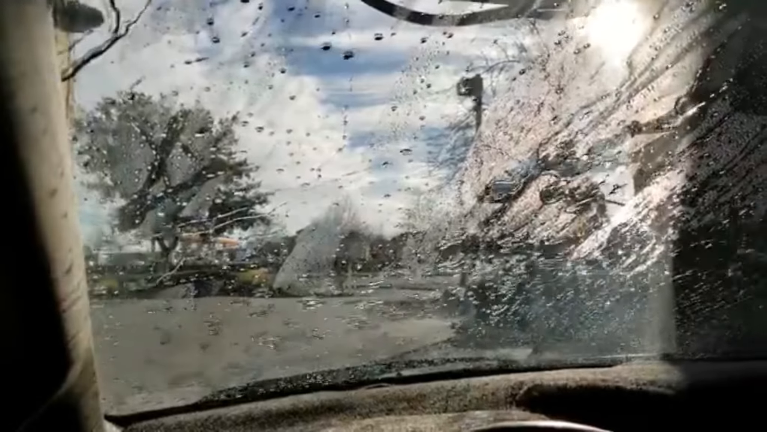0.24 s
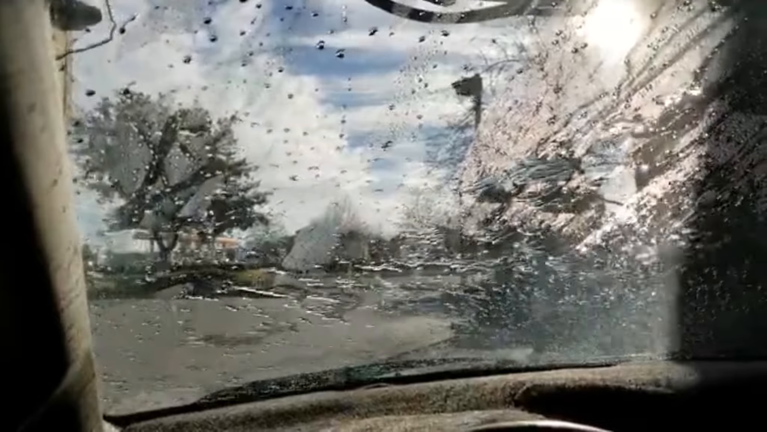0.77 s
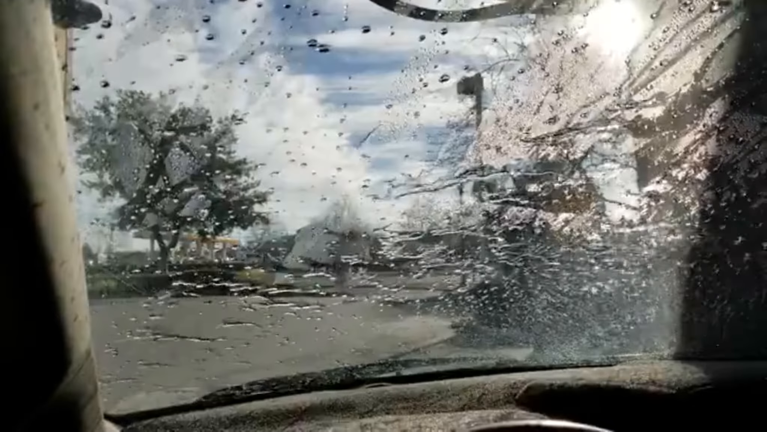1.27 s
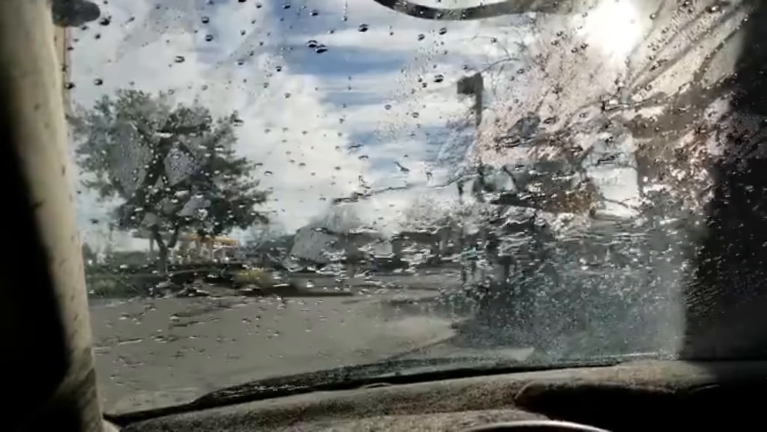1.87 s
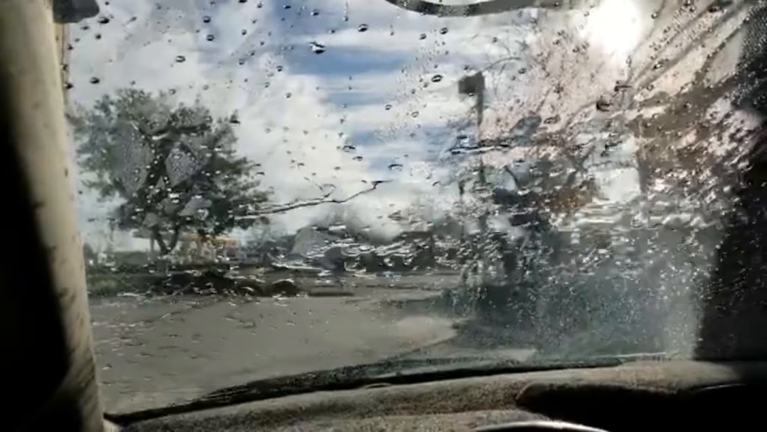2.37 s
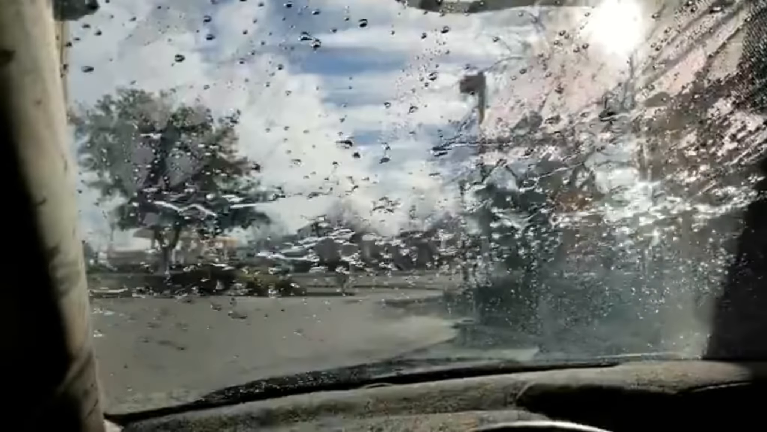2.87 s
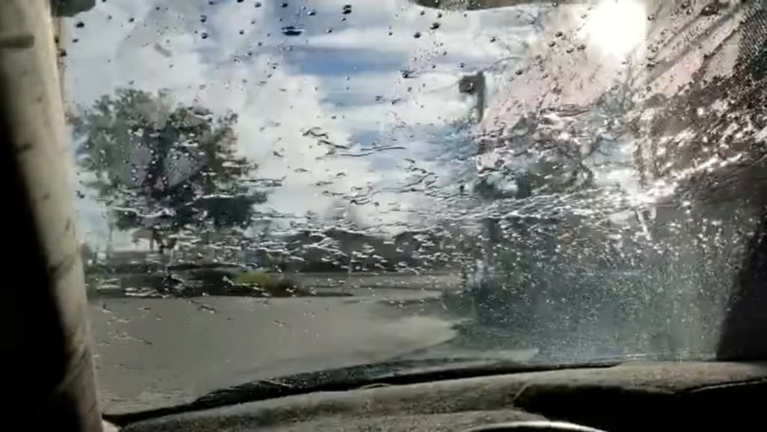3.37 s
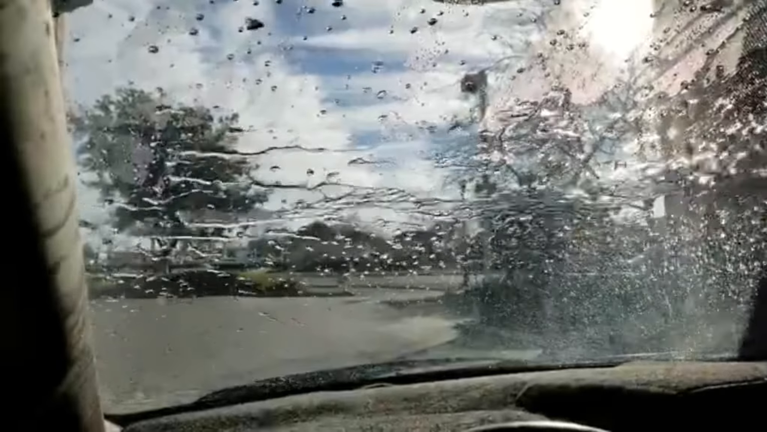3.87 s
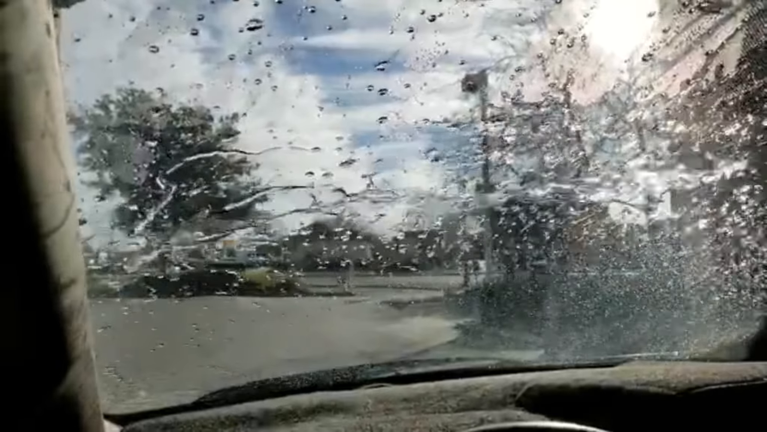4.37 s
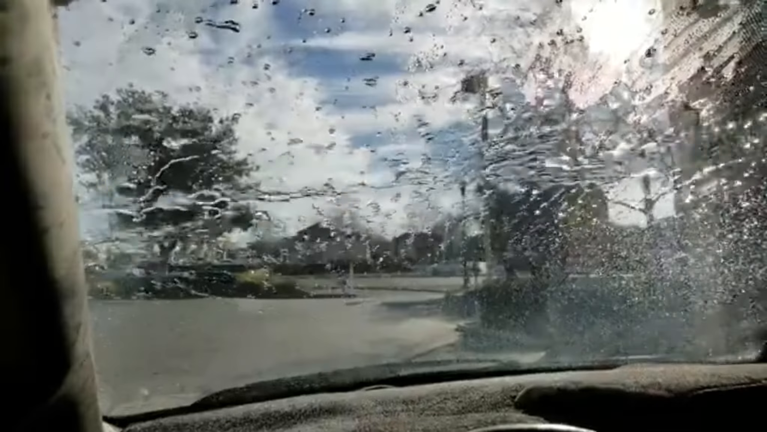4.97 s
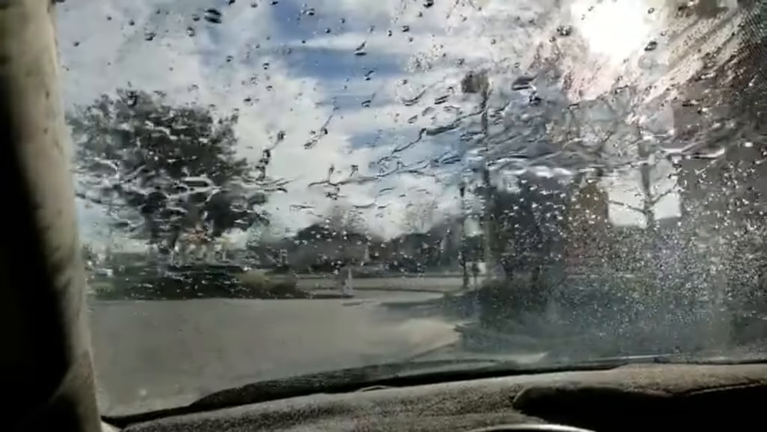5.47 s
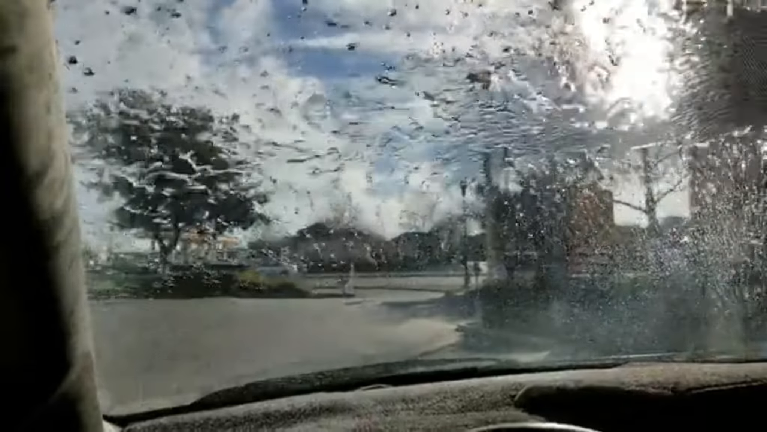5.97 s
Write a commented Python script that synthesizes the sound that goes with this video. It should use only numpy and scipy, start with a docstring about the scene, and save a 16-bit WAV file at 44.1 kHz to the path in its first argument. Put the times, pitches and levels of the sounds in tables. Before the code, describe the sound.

Powerful blowers roar over a car's roof and glass, heard from the cabin as dull rushing air, uneven low rumble and constant humming.

```python
"""Closed cabin in an automatic car wash, under the dryer blowers, heard by two small microphones.
Two fans hum close, wavering notes: phase-wobbled sines, with a rough octave and a low drone.
Air rushes dulled through the windows: coloured noise, only partly common to both sides.
The jets buffet roof, doors and glass: low noise through cabin resonances, of uneven level."""
import sys
import numpy as np
from scipy import signal
from scipy.fft import rfft, irfft
from scipy.io import wavfile
from scipy.ndimage import uniform_filter1d, minimum_filter1d

SR = 44100
rng = np.random.default_rng(int(sys.argv[2]) if len(sys.argv) > 2 else 0)


def dump(signal):
    """Clip the signal to [-1, 1] and save it as 16-bit WAV at the path in sys.argv[1]."""
    limited = np.clip(np.atleast_2d(signal).T, -1, 1)
    pcm = np.round(limited * 32767).astype(np.int16)
    wavfile.write(sys.argv[1], SR, pcm)


def gain_from_decibels(decibels):
    """Convert decibel values to linear amplitude factors."""
    exponent = np.asarray(decibels, float) / 20
    return 10 ** exponent


N = 274302
HZ = np.fft.rfftfreq(N, 1 / SR) + 1e-3   # offset keeps log and division finite


def rms_one(x):
    """Scale to unit power."""
    return x / np.sqrt(np.mean(x ** 2) + 1e-20)


def in_time(rows):
    """Columns of a time table at every sample."""
    time_s, *columns = np.transpose(rows)
    return [np.interp(np.arange(N) / SR, time_s, column) for column in columns]


def at_hz(points):
    """A spectrum table read on a log-frequency axis."""
    hz, value = np.transpose(points)
    return np.interp(np.log(HZ), np.log(hz), value)


def drift(rate):
    """Slow chance: noise through a double one-pole low-pass, rms 1."""
    step = 40   # samples per point of the slow noise
    pole = np.exp(-2 * np.pi * rate * step / SR)
    noise = rng.standard_normal(N // step + 2002)
    slow = signal.lfilter([1], [1, -2 * pole, pole * pole], noise)[2000:]   # start-up dropped
    return np.interp(np.arange(N) / step, np.arange(len(slow)), rms_one(slow))


# resonances of cabin and panels: (frequency [Hz], width [Hz], lift [dB])
CABIN_MODES = [(82.4, 31, 8.5), (109.6, 12.5, 8), (145.4, 28, 9.5), (198, 25, 0.5), (231, 22.6, 4),
               (284, 38, 2), (296, 22, 0.5), (598, 60, 2), (747, 28, 1), (768, 146, 2.5), (780, 20, 1),
               (1020, 40, 2.5), (1370, 275, 3.5), (1700, 93, 1.5), (2660, 200, 1.1), (3770, 400, 1.3),
               (4700, 400, -0.3), (6200, 300, 0.7)]


def cabin_db():
    """Each resonance lifts a bell-shaped band."""
    return sum(db / (1 + (2 * (HZ - hz) / width_hz) ** 2) for hz, width_hz, db in CABIN_MODES)


# balance of the microphones: (frequency [Hz], left minus right [dB])
LEFT_OVER_RIGHT = [(60, 1.8), (210, 2.5), (500, 2), (770, 1), (1500, 4), (1900, 1), (4200, 2.5), (9800, -1),
                   (15000, -3.5)]


def turbulence(spectrum, common, lag_s, patchy_db, patch_rate):
    """Stereo noise, partly common to both sides, whose octaves waver on their own; mid rms 1."""
    shared, left, right = rfft(rng.standard_normal((3, N)))
    share = np.clip(common, 0, 1)
    late = np.exp(-2j * np.pi * HZ * lag_s)
    shared_pair = shared * np.array([late, np.ones_like(late)])
    pair = np.sqrt(share) * shared_pair + np.sqrt(1 - share) * np.array([left, right])
    balance_db = at_hz(LEFT_OVER_RIGHT) * [[.5], [-.5]]
    pair *= gain_from_decibels(at_hz(spectrum) + cabin_db() + balance_db)
    out = 0
    for octave in range(5, 15):
        # neighbouring bands add to one
        overlap = np.cos(np.pi / 2 * np.clip(np.log2(HZ) - octave, -1, 1)) ** 2
        out = out + gain_from_decibels(patchy_db * drift(patch_rate)) * irfft(pair * overlap, N)
    return out / np.sqrt(np.mean(out.mean(axis=0) ** 2))


def fan(hz, level_db, rough, rate):
    """Eddies scatter the note: its phase wobbles, by rough [rad rms]."""
    phase = 2 * np.pi * np.cumsum(hz + np.zeros(N)) / SR + rough * drift(rate)
    return gain_from_decibels(level_db) * np.sqrt(2) * np.sin(phase)


# blade passing note of the near fan: (time [s], frequency [Hz], level [dB])
NEAR_HUM = [(0.0, 518, -32.5), (0.33, 515.6, -32.5), (0.5, 515.3, -30.5), (0.76, 516.8, -25),
            (0.85, 516.1, -36), (1.1, 515.5, -33), (1.55, 516.4, -41), (1.71, 517.4, -23.5),
            (1.8, 517.4, -29.5), (1.9, 517.6, -28.5), (2.1, 517, -30), (2.2, 516, -46),
            (2.33, 516.7, -24.5), (2.44, 516.7, -36), (2.56, 516.4, -25), (2.64, 517.6, -38),
            (2.69, 517.2, -21.5), (2.86, 517.1, -25.5), (2.93, 517.3, -34.5), (3.1, 515.4, -30),
            (3.39, 517.2, -29), (3.55, 517, -43), (3.66, 519.3, -30.5), (3.78, 519.1, -36),
            (4.0, 518.6, -29), (4.19, 518.3, -24.5), (4.3, 516.6, -34), (4.5, 516.4, -38),
            (4.65, 519, -26.5), (4.9, 514, -33.5), (5.2, 514, -36), (5.4, 516, -31), (5.7, 517.4, -34.5),
            (6.0, 517, -33.5), (6.22, 519, -29.5)]
# note of a second fan, in opposite phase at the two microphones: (time [s], level [dB])
SIDE_HUM = [(0, -44), (.2, -30), (.35, -43), (.85, -42), (1.0, -35), (1.3, -41), (2.4, -44), (2.52, -33),
            (2.7, -44), (3.1, -38), (3.4, -45), (3.55, -33), (3.85, -34), (4.0, -43), (4.65, -43),
            (4.77, -34), (5.0, -42), (5.5, -40), (5.7, -33), (5.9, -41), (6.22, -41)]
# companions of the note: (time [s], octave above [dB], low drone of the fan housing [dB])
COMPANIONS = [(0, -44, -33), (.5, -50, -39), (.9, -50, -31), (1.4, -54, -32.5), (1.8, -39, -29),
              (2.1, -55, -35), (2.35, -50, -41), (2.7, -38, -27.5), (3.3, -40, -35.5), (3.6, -47, -31),
              (4.2, -48, -32), (4.6, -54, -39), (4.85, -37, -36), (5.05, -48, -24.5), (5.5, -58, -36),
              (5.9, -44, -32), (6.22, -50, -38)]


def blades():
    """Two fans a little apart in speed beat differently at each microphone; octave above, drone below."""
    near_hz, near_db = in_time(NEAR_HUM)
    side_db, = in_time(SIDE_HUM)
    octave_db, drone_db = in_time(COMPANIONS)
    near = fan(near_hz, near_db + 1.5 * drift(9), rough=.6, rate=7)
    side = fan(517.2, side_db + 1.5 * drift(6), rough=1.2, rate=4) * [[1], [-1]]
    octave = np.array([fan(2 * near_hz - 2.5, octave_db + side_loss_db + 2.5 * drift(4.5), rough=1.6, rate=8.2)
                       for side_loss_db in (0, -4)])   # left, right
    drone = fan(230.5, drone_db + 1.5 * drift(4.5), rough=1.37, rate=4.2)
    drone = drone * gain_from_decibels([[1.5], [-1.5]])   # louder on the left
    return near + side + octave + drone


# colour of the rush before the resonances: (frequency [Hz], relative density [dB per Hz])
RUSH_COLOUR = [(150, -30), (270, -11), (404, -10.5), (520, -10), (669, -18.5), (1030, -20.5), (1840, -30),
               (3000, -34), (3900, -34.5), (5500, -43.5), (8000, -52.5), (9200, -60), (12600, -58),
               (15600, -64.5)]
# likeness of the rush at the two microphones: (frequency [Hz], common share [0-1])
RUSH_COMMON = [(270, 0.46), (330, .5), (430, 0.37), (490, 0.23), (580, 0.85), (700, 0.32), (1300, 0.31),
               (3000, 0.1), (8000, .05)]
# rush of air past the windows: (time [s], level [dB])
AIRFLOW = [(0.0, -21.5), (0.81, -24.5), (1.68, -24), (1.99, -23), (2.2, -24), (2.8, -24), (3.41, -22.5),
           (3.9, -24), (4.45, -24.5), (4.71, -23.5), (5.3, -23.5), (5.7, -24.5), (6.22, -24)]
# change of the rush's treble, dulled near the end: (time [s], level [dB])
RUSH_TREBLE = [(0, 0.8), (2.8, 0.7), (3.3, 0.5), (4.8, 1), (5.4, -0.3), (5.7, -2.2), (6.22, 0.5)]


def rush():
    """Short waves enter from the right and reach the left microphone later; the treble dulls near the end."""
    left_lag_s, lag_from_hz, treble_from_hz = 0.000408, 690, 7500
    lag_s = left_lag_s / (1 + (lag_from_hz / HZ) ** 4)
    air = turbulence(RUSH_COLOUR, at_hz(RUSH_COMMON), lag_s, patchy_db=.5, patch_rate=4.4)
    treble = irfft(rfft(air) / (1 + (treble_from_hz / HZ) ** 6), N)
    level_db, = in_time(AIRFLOW)
    treble_db, = in_time(RUSH_TREBLE)
    return gain_from_decibels(level_db) * (air + (gain_from_decibels(treble_db) - 1) * treble)


def panels(spectrum, level_db, common, smooth_s):
    """Long waves fill the cabin, nearly alike at both microphones; the noise's own swells are eased."""
    steady = turbulence(spectrum, common, lag_s=0, patchy_db=0.32, patch_rate=4.2)
    swell_power = uniform_filter1d(np.mean(steady ** 2, axis=0), round(smooth_s * SR))
    return gain_from_decibels(level_db) * steady / swell_power ** 0.35


# colour of the panels' boom before the resonances: (frequency [Hz], relative density [dB per Hz])
BOOM_COLOUR = [(20, -27), (32, -6.5), (50, -1), (80, 0), (130, -1), (165, -4), (210, -30), (300, -88)]
# colour of the drumming glass before the resonances: (frequency [Hz], relative density [dB per Hz])
DRUM_COLOUR = [(100, -48), (145, -18), (180, 3), (260, -0.5), (320, -6), (420, -16), (600, -72)]
# level of the low noise, uneven partly by chance: (time [s], boom [dB], drumming [dB])
LOW_NOISE = [(0.0, -16.5, -23), (0.31, -15.5, -16), (0.38, -13, -22), (0.42, -17.5, -22),
             (0.74, -20.5, -20.5), (1.44, -16, -22), (1.64, -22.5, -20), (1.94, -12.5, -23),
             (1.96, -18, -20.5), (2.84, -18.5, -22), (2.93, -12, -21.5), (2.96, -18, -25), (3.55, -14, -19),
             (4.24, -15, -22), (4.28, -18.5, -16.5), (4.35, -19, -22.5), (5.16, -12, -19), (5.25, -15, -22),
             (5.87, -15, -21), (5.92, -8, -17.5), (6.05, -17, -22.5), (6.22, -14.5, -25)]


def buffeting():
    """Roof and doors, buffeted, boom; the glass drums higher."""
    boom_db, drum_db = in_time(LOW_NOISE)
    boom = panels(BOOM_COLOUR, boom_db, common=1.0, smooth_s=0.11)
    drumming = panels(DRUM_COLOUR, drum_db, common=0.97, smooth_s=0.18)
    return boom + drumming


def scene():
    """Fan notes, rush, boom and drumming together."""
    return blades() + rush() + buffeting()


def top_cut(x):
    """Nothing passes above the cut-off."""
    return signal.sosfilt(signal.butter(12, 15700, fs=SR, output="sos"), x)


def record(dry):
    """A limiter turns both channels down just ahead of peaks over its ceiling and recovers slowly."""
    ceiling, recovery_db_per_s, ahead_s, fade_s = .97, 9.3, .004, .003
    over_db = np.maximum(20 * np.log10(np.abs(dry).max(axis=0) / ceiling + 1e-9), 0)
    recovery_db = recovery_db_per_s * np.arange(N) / SR
    held_db = np.maximum.accumulate(over_db + recovery_db) - recovery_db
    ahead = round(ahead_s * SR)
    widened_db = -minimum_filter1d(-held_db, 2 * ahead)   # running maximum
    cut_db = uniform_filter1d(widened_db, ahead)
    ends = signal.windows.tukey(N, 2 * fade_s * SR / N)   # fade in and out
    return top_cut(dry * gain_from_decibels(-cut_db) * ends)


dry = scene()
out = record(dry)
dump(out)
```